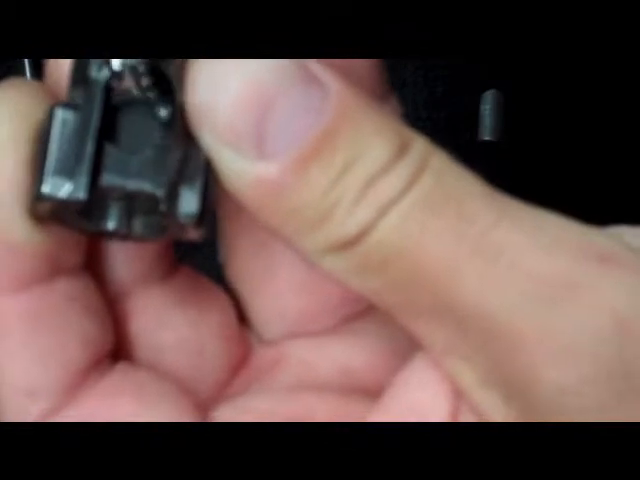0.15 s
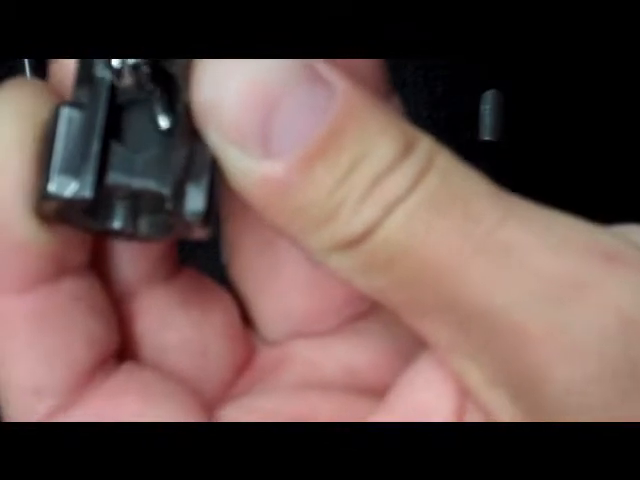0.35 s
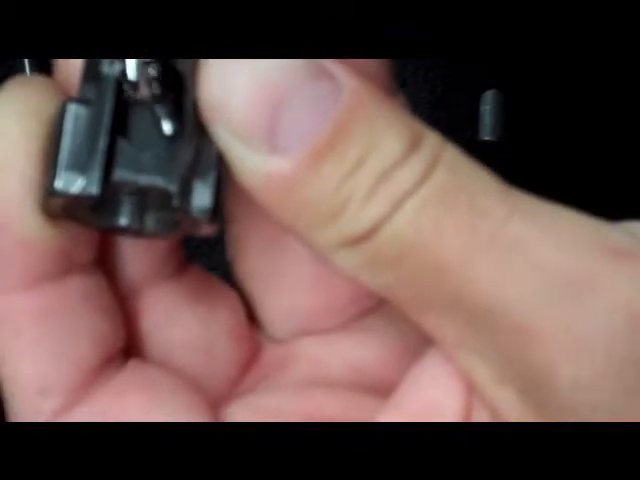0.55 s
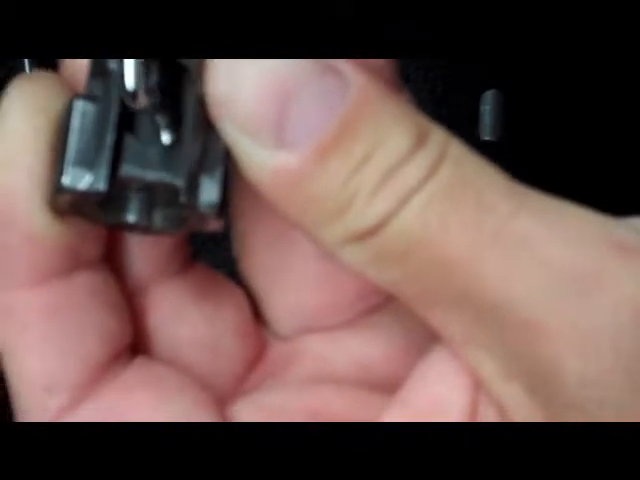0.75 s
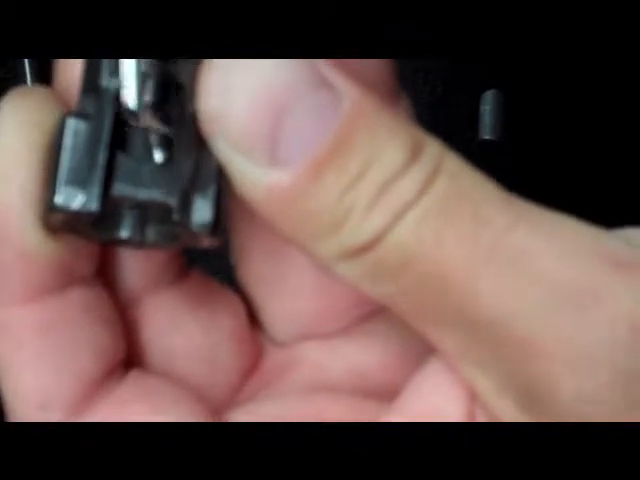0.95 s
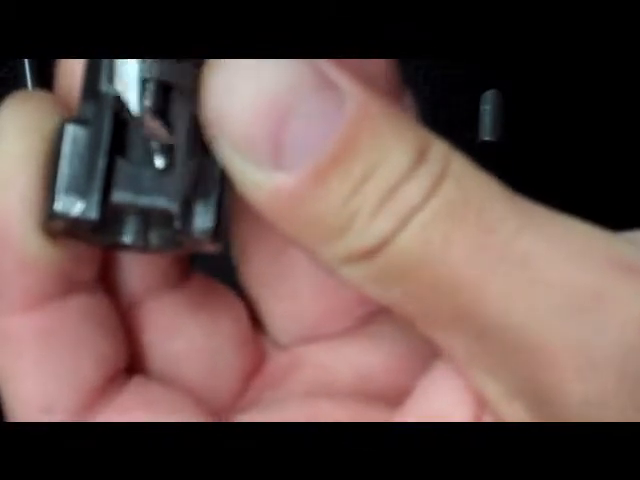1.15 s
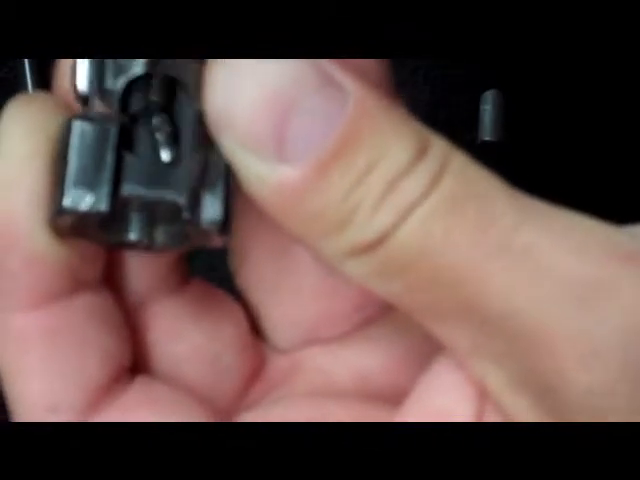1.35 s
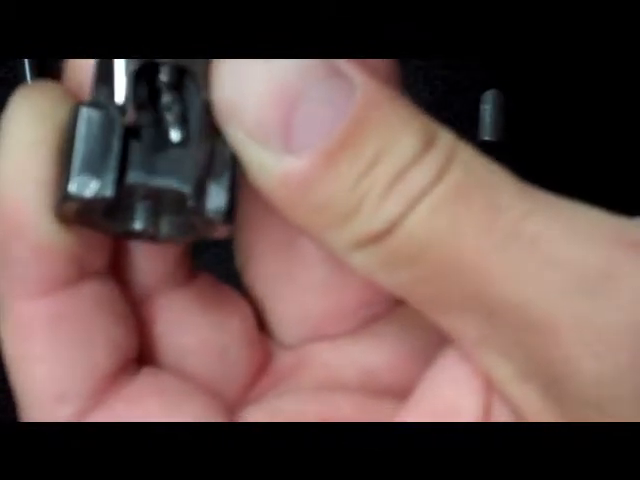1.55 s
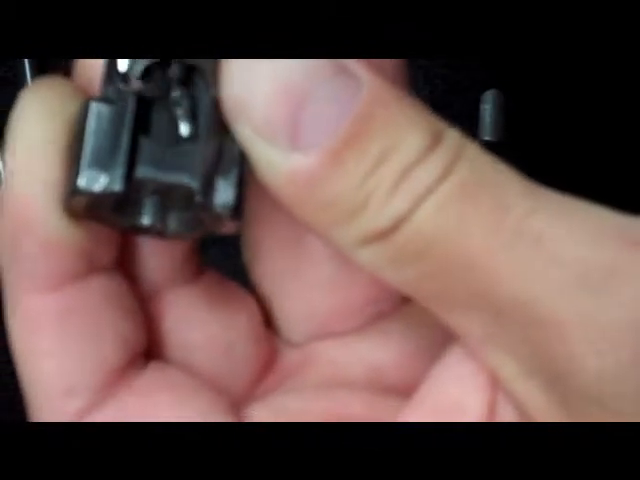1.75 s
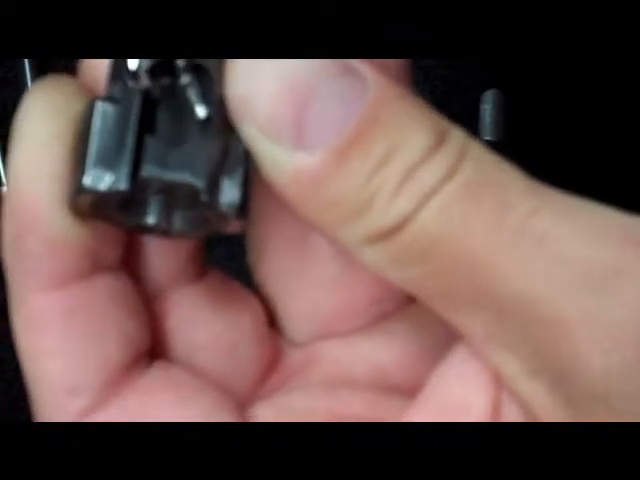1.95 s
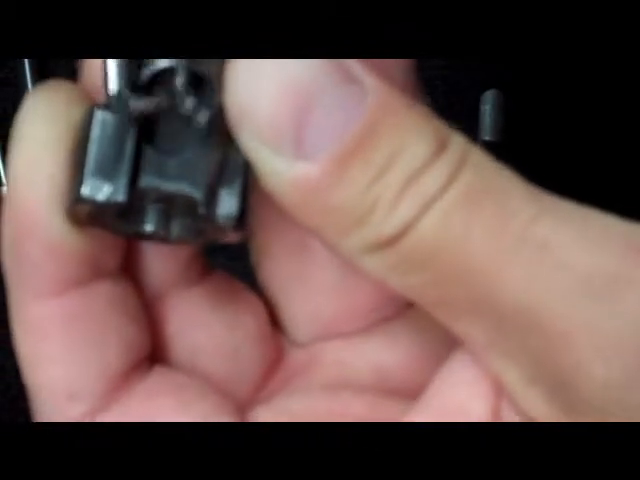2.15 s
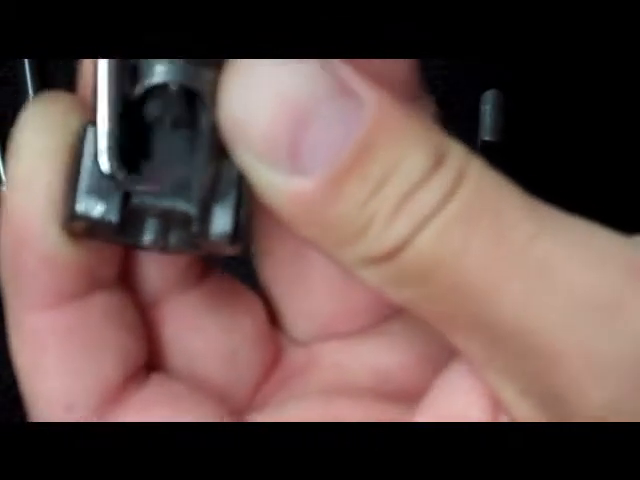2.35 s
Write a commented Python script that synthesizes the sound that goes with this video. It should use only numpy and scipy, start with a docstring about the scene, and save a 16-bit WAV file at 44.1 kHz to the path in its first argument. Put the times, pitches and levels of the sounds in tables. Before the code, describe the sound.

Small steel gun parts click and scrape dryly as fingers work them up close.

```python
"""Dry clicks and short scrapes of a small steel mechanism, worked by fingers close to the microphone.
Its parts catch and snap, slide in stick-slip runs and knock against their stops; the hand damps the
frame, so only a few modes ring on. Faint rubbing goes with them, and a thin squeak comes at the end.
Behind it all is a quiet room with a beating machine hum and a soft midrange swell."""
import sys
import numpy as np
from scipy import signal
from scipy.fft import rfft, irfft
from scipy.io import wavfile

SR = 44100
rng = np.random.default_rng(int(sys.argv[2]) if len(sys.argv) > 2 else 0)


def wav_out(sig):
    """Save sig, one row per channel (or a flat mono array), as 16-bit PCM at SR to the path in sys.argv[1]."""
    wavfile.write(sys.argv[1], SR, np.round(np.clip(np.atleast_2d(sig).T, -1, 1) * 32767).astype(np.int16))


N = 110250
T = np.arange(N) / SR
FFT_SIZE = 2 * N
FREQS = np.maximum(np.arange(N + 1) * SR / FFT_SIZE, 1)
HISS_TOP_HZ = 14200
FRICTION_WIDTH_DB = -6  # friction noise that each channel has to itself


def amp(db):
    """Decibels to gain."""
    return 10 ** (np.asarray(db) / 20)


def unit(x):
    """Scale to rms 1."""
    return x / np.sqrt(np.mean(x ** 2))


def gains(points):
    """Gain per frequency from (freq_hz, level_db) points."""
    hz, db = np.array(points, float).T
    return amp(np.interp(np.log(FREQS), np.log(hz), db))


def envelope(points):
    """Gain over time from (time_s, level_db) points."""
    times, db = np.array(points).T
    return amp(np.interp(T, times, db))


def minimum_phase(gain):
    """Causal spectrum with the given gain per frequency."""
    n = len(gain) - 1
    fold = np.r_[1, np.full(n - 1, 2), 1, np.zeros(n - 1)]
    cepstrum = irfft(np.log(gain))
    return np.exp(rfft(cepstrum * fold))


def colour(x, gain):
    """Causal filter with the given gain per frequency."""
    return irfft(rfft(x, FFT_SIZE) * minimum_phase(gain))[..., :N]


def impulse(gain):
    """Short response of a filter with the given gain per frequency."""
    return irfft(minimum_phase(gain[::50]))[:SR // 20]


def low_pass(x, hz):
    """Steep low-pass."""
    return signal.sosfilt(signal.ellip(8, .2, 70, hz, fs=SR, output="sos"), x)


def convolve(x, response):
    """Play a signal through a response."""
    return signal.fftconvolve(x, response)[:N]


def fade(t, t60):
    """Exponential decay, 60 dB down after t60 seconds."""
    return np.exp(-np.log(1000) * t / t60)


def ring(modes):
    """Response of a set of damped modes."""
    t = T[:N // 2]
    return sum(amp(db) * np.sin(2 * np.pi * hz * t) * fade(t, t60) for hz, db, t60 in modes)


def add(out, start_s, x):
    """Mix a sound in at a time."""
    i = int(start_s * SR)
    out[i:i + len(x)] += x[:N - i]


def waver(rate_hz):
    """A random wander, spread near 1."""
    return np.interp(T * rate_hz, np.arange(2000), rng.standard_normal(2000))


# Machine hum in the room: pitch_hz, level_db
HUM_LINES = [(120.2, -57.5), (137.6, -55), (196.4, -68.5), (222.9, -69.5)]
# Rumble and hiss of the quiet room: freq_hz, level_db
ROOM_SPECTRUM = [(15, -24), (33, 4.5), (130, -3.5), (300, -5.5), (600, -18), (1000, -19.5), (1600, -22),
                 (4000, -25), (14000, -31)]
# Share of that noise reaching the microphone from all around: freq_hz, share_db
DIFFUSE_SHARE = [(30, -28.5), (300, -13), (800, -1)]
def room_tone(noise_db=-56, waver_db=2.5, left_minus_right_db=-8):
    """Mains and motor hum beat against each other over rumble and thin hiss."""
    hum = np.zeros(N)
    for hz, db in HUM_LINES:
        level = amp(db + waver_db * waver(6.75))
        phase = 2 * np.pi * (hz * T + rng.random()) + 0.044 * waver(1.1)
        hum += level * unit(np.sin(phase))
    share = np.clip(gains(DIFFUSE_SHARE), .01, .99)
    spectrum = amp(noise_db) * unit(gains(ROOM_SPECTRUM))
    common = colour(rng.standard_normal(N), spectrum * np.sqrt(1 - share ** 2))
    diffuse = colour(rng.standard_normal((2, N)), spectrum * share)
    pan = amp(np.array([[left_minus_right_db], [-left_minus_right_db]]) / 2)
    return low_pass(pan / pan.mean() * (hum + common) + diffuse, HISS_TOP_HZ)


# A faint rush in the background: time_s, level_db
SWELL_LEVELS = [(0, -72.5), (.7, -67), (1.4, -64.5), (1.7, -72.5)]
# Its colour at the microphone: freq_hz, level_db
SWELL_COLOUR = [(150, -2), (350, 2), (1000, 5.5), (1500, -23.5), (5000, -22)]
def swell():
    """A soft midrange rush that grows and recedes."""
    noise = rng.standard_normal(N) + .5 * rng.standard_normal((2, N))
    rush = unit(colour(noise, gains(SWELL_COLOUR))) * envelope(SWELL_LEVELS)
    return low_pass(rush, HISS_TOP_HZ)


def room_reflections(x, level_db=-17, t60_s=0.26):
    """The small room returns a dense decaying tail, different in each channel."""
    tails = rng.standard_normal((2, N)) * fade(T, t60_s) * (1 - fade(T, t60_s / 10))
    return np.array([convolve(x, amp(level_db) * tail / np.linalg.norm(tail)) for tail in tails])


# Faint rubbing under the fingers, close up: time_s, level_db
RUB_LEVELS = [(0, -82), (.85, -66), (1.1, -64.5), (1.4, -57.5), (1.65, -56), (1.77, -62), (1.98, -57.5),
              (2.35, -73), (2.46, -55)]
# Its colour: freq_hz, level_db
RUB_COLOUR = [(400, 1.5), (1000, -7), (1700, -10.5), (2030, 0), (2350, -11.5), (4100, -13.5), (4950, 0),
              (6200, -1.5), (7300, -9.5), (10000, -35), (14000, -31), (15000, -55)]
def rubbing():
    """Fine continuous friction as the fingers keep the parts moving."""
    grain = rng.standard_normal(N) + amp(FRICTION_WIDTH_DB) * rng.standard_normal((2, N))
    return unit(colour(grain, gains(RUB_COLOUR))) * envelope(RUB_LEVELS)


# Thin squeak of a sliding part, faint even this close: time_s, pitch_hz, level_db
SQUEAK_GLIDE = [(2.411, 4640, -85), (2.437, 4880, -57.5), (2.466, 5120, -75), (2.49, 5300, -76)]
def squeak(jitter=0.0073, octave_db=-19):
    """An unsteady whistle of friction that rises in pitch."""
    times, hz, db = np.array(SQUEAK_GLIDE).T
    pitch_hz = np.interp(T, times, hz) * (1 + jitter * waver(480))
    phase = 2 * np.pi * np.cumsum(pitch_hz) / SR
    level = np.interp(T, times, amp(db), left=0, right=0)
    return level * (np.sin(phase) + amp(octave_db) * np.sin(2 * phase))


# The frame, held in the hand near the microphone: pitch_hz, level_db, t60_s
HELD_FRAME_MODES = [(1160, -39, 0.046), (1340, -33.5, 0.017), (2020, -38.5, 0.039), (2142, -36, 0.06),
                    (2670, -28, 0.0078)]
# Knocks against a stop in that frame: start_s, level_db
STOP_KNOCKS = [(1.5263, -9), (1.826, -16), (2.1237, -25), (2.2309, -10.5), (2.2339, -10.5)]
def knocks(low_cut_hz=840):
    """A part reaches its stop and knocks the small hand-damped frame, which gives out no bass."""
    out, frame = np.zeros(N), ring(HELD_FRAME_MODES)
    for start_s, db in STOP_KNOCKS:
        add(out, start_s, amp(db) * frame)
    return signal.sosfilt(signal.butter(2, low_cut_hz, "high", fs=SR, output="sos"), out)


def slips(per_s=1500, spread_db=3):
    """A random train of tiny stick-slip impacts of uneven size."""
    hits = rng.random(N) < per_s / SR
    signs = rng.choice([-1, 1], N)
    sizes = amp(spread_db * np.clip(rng.standard_normal(N), -2, 2))
    return unit(hits * signs * sizes)


SLIDE_HZ = 5500
# Sliding steel heard close up, for a resonance at SLIDE_HZ: freq_hz, level_db
SLIDE_SPECTRUM = [(300, -27.5), (1100, -20.5), (2000, -19), (2700, -15.5), (3900, -9), (4900, 2), (5800, 6),
                  (6900, -3), (8000, -6.5), (9500, -18.5), (14000, -28.5)]
# Scrapes at the microphone: start_s, length_s, first_db, last_db, resonance_hz
SCRAPE_RUNS = [(.223, 0.041, -48.5, -48, 5450), (0.264, .053, -56, -66, 5730),
               (0.48, 0.031, -50.5, -48, 5400), (0.532, 0.051, -62, -55, 5130),
               (.718, 0.033, -59.5, -41, 5370), (0.749, 0.057, -59.5, -56, 5360),
               (0.959, 0.017, -57, -48, 5470), (1.052, 0.033, -44.5, -46, 5650),
               (1.121, 0.013, -56, -46.5, 5950), (1.5, .014, -41.5, -34, 5520),
               (1.529, 0.043, -66, -59, 5500), (1.569, 0.034, -44, -50, 5180),
               (1.807, 0.03, -40, -52, 5300), (2.077, 0.036, -64, -46, 5260),
               (2.116, 0.0055, -41, -36.5, 5500), (2.164, 0.046, -55.5, -43, 5450),
               (2.206, 0.0255, -45.5, -28.5, 5580), (2.229, 0.0512, -35.5, -42.5, 5320),
               (2.2876, 0.0058, -36.5, -31, 5530)]
def scrapes(release_s=.0022, direct_db=-1.5, slider_db=-11, larger_part_db=-23):
    """Runs of slips swell or ebb and stop quickly; they ring the slider and, faintly, the larger part."""
    t, train = T[:SR // 10], slips()
    direct, drive = np.zeros((2, N)), np.zeros(N)
    for start_s, length_s, first_db, last_db, resonance_hz in SCRAPE_RUNS:
        release = np.exp(-np.maximum(t - length_s, 0) / release_s)
        force = amp(np.interp(t, [0, length_s], [first_db, last_db])) * release
        run = force * train[int(start_s * SR):][:len(t)]
        add(drive, start_s, run)
        shifted = [(hz * resonance_hz / SLIDE_HZ, db) for hz, db in SLIDE_SPECTRUM]
        steel = impulse(unit(gains(shifted)))
        for channel in direct:
            grain = amp(FRICTION_WIDTH_DB) * force * rng.standard_normal(len(t))
            add(channel, start_s, convolve(run + grain, steel))
    slider = ring([(hz, 0, .09) for hz in (4615, 4857, 4978, 5280, 5517, 5687, 5917)])
    slider *= amp(slider_db) / np.linalg.norm(slider)
    larger_part = ring(LARGER_PART_MODES)
    larger_part *= amp(larger_part_db) / np.linalg.norm(larger_part)
    return amp(direct_db) * direct + convolve(drive, slider + larger_part)


def scatter(snap, level_db=-6, t60_s=.014):
    """A snap arrives directly, then by many short paths among hands and parts."""
    t = T[:len(snap)]
    paths = rng.standard_normal(len(t)) * fade(t, t60_s) * (1 - fade(t, t60_s / 2))
    paths *= amp(level_db) / np.linalg.norm(paths)
    return convolve(np.r_[1, paths], snap)


# Steel striking steel, close up: freq_hz, level_db
CONTACT_SPECTRUM = [(150, -71), (1100, -26.5), (2500, -26), (3600, -13), (4600, -1), (5900, 6.5), (6950, 0),
                    (7700, 3.5), (9500, -21), (14000, -25.5), (16000, -54.5)]
# Long ring of the larger part: pitch_hz, level_db, t60_s
LARGER_PART_MODES = [(3222, -47, .19), (3265, -50, .13), (4970, -37, .04), (6645, -41, .2),
                     (6685, -46, .16)]
# High tink of the smaller part: pitch_hz, level_db, t60_s
SMALLER_PART_MODES = [(8160, -32.5, .08), (8260, -34, .05)]
# Part catching on part, right at the microphone:
# start_s, level_db, pitch_hz, larger_ring_db, smaller_ring_db, treble_db_per_octave
CLICK_CONTACTS = [(0.141, -28.5, 6080, 2, -2, 8.5), (0.2248, -28, 5600, -6, -10, -11),
                  (0.2386, -23.5, 5550, -11, -17, -6), (0.2624, -32.5, 5700, 4, -10, -18),
                  (0.3794, -21.5, 4800, 10, -12, 7), (0.4807, -26.5, 5700, 12.5, -16, 8),
                  (.4918, -30, 5560, 1, -18, -8), (0.5683, -35.5, 5200, 4, -14, -22),
                  (0.7373, -35, 5100, -10, -15, -22), (0.7522, -29.5, 5300, 16.5, -5, -3),
                  (0.9734, -33, 5600, -1, -12, -9.5), (1.0517, -31.5, 6040, -11, 14, 2),
                  (1.1351, -31.5, 5950, -4, 10, -16), (1.464, -15.5, 6050, 7.5, -19, -6),
                  (1.4683, -23, 6040, -3, 4, -8), (1.5263, -11, 5380, 12, -1, -4.5),
                  (1.7949, -24, 5330, -12, -15, -7), (1.8030, -27.5, 5300, 4, 0, -16),
                  (1.8081, -24.5, 5560, -2, -8, -4), (1.8187, -22, 5640, -22, 12.5, -6),
                  (2.0807, -35.5, 4140, 4, 8, -6), (2.1199, -22.5, 5760, 7.5, -8, -5),
                  (2.123, -22.5, 5760, 5, 12, -22), (2.1846, -23, 5430, -10, -6, -6),
                  (2.2015, -18, 5860, 2, 1, -18), (2.231, -8, 5350, 3, -11, -1.5),
                  (2.2925, -17, 6400, -9, -5, -19)]
def clicks(snap_db=-2.5, ping_db=-4, rise_s=.00025, treble_hz=6500, mode_spread_db=7.5):
    """Each contact snaps, duller when it grazes, pings at its own pitch and sets both parts ringing."""
    t, out, steel = T[:N // 2], np.zeros((2, N)), gains(CONTACT_SPECTRUM)
    treble_octaves = np.log2(np.maximum(FREQS / treble_hz, 1))
    ping_envelope = amp(ping_db) * t / rise_s * np.exp(1 - t / rise_s)
    for start_s, level_db, pitch_hz, larger_db, smaller_db, treble_slope in CLICK_CONTACTS:
        snap = impulse(steel * amp(treble_slope * treble_octaves))
        snap *= amp(snap_db) / np.abs(snap).max()
        ping = ping_envelope * np.sin(2 * np.pi * pitch_hz * t)
        struck_modes = [(hz, db + mode_spread_db * rng.standard_normal(), t60)
                        for hz, db, t60 in LARGER_PART_MODES]
        ringing = amp(larger_db) * ring(struck_modes) + amp(smaller_db) * ring(SMALLER_PART_MODES)
        for channel in out:
            add(channel, start_s, amp(level_db) * (ping + ringing))
            add(channel, start_s, amp(level_db) * scatter(snap))
    return out


# Balance at the stereo microphone, only the high treble leaning left: freq_hz, left_minus_right_db
MICROPHONE_BALANCE = [(1000, -9), (3000, -7.5), (4600, -7.5), (5900, -12), (6800, 0), (7800, 7.5),
                      (10000, 5.5), (15000, 3.5)]
def scene():
    """The mechanism, close and a little to the right, in a small dry room."""
    metal = clicks() + knocks() + low_pass(scrapes() + rubbing(), HISS_TOP_HZ) + squeak()
    left, right = metal + room_reflections(metal.mean(axis=0)) + swell()
    ratio = gains(MICROPHONE_BALANCE)
    left = colour(left, 2 * ratio / (1 + ratio))
    right = colour(right, 2 / (1 + ratio))
    return np.array([left, right]) + room_tone()


def record(dry):
    """The recorder cuts the top."""
    return low_pass(dry, hz=16300)


dry = scene()
out = record(dry)
wav_out(out)
```